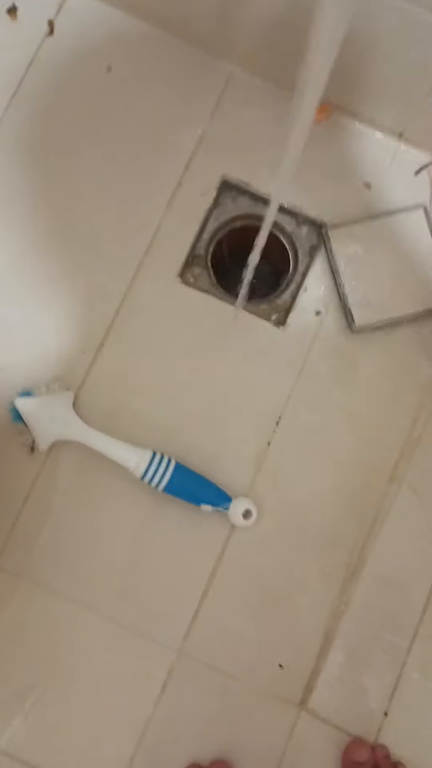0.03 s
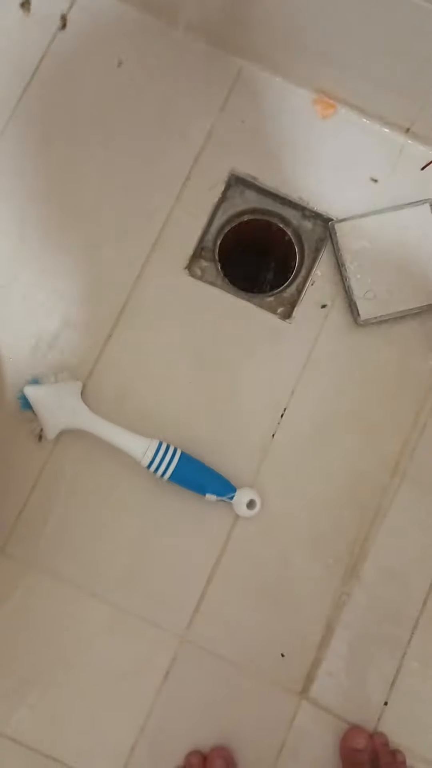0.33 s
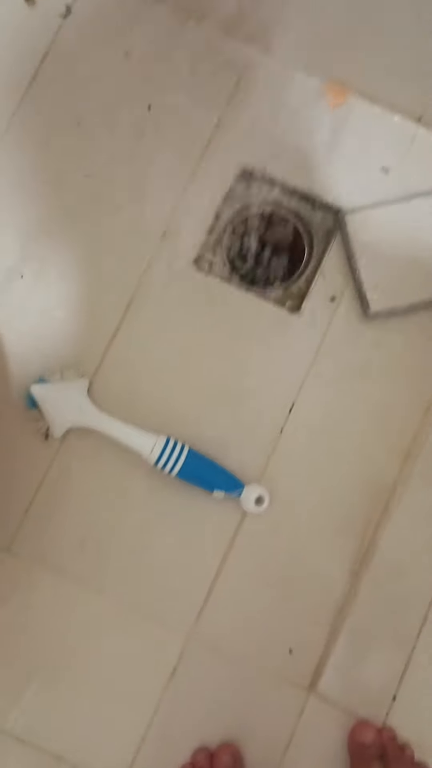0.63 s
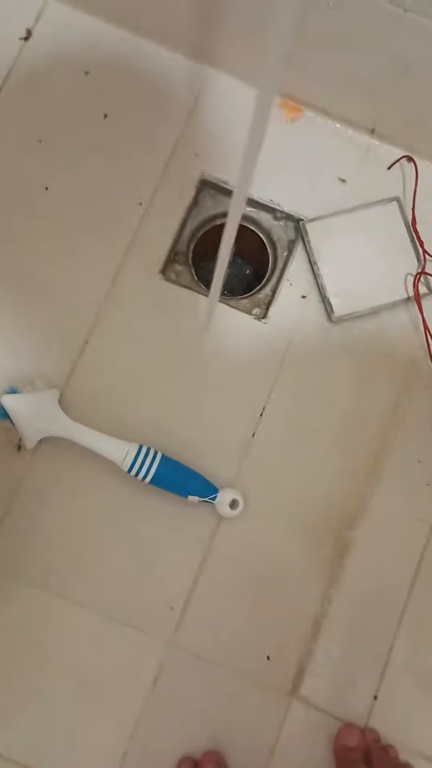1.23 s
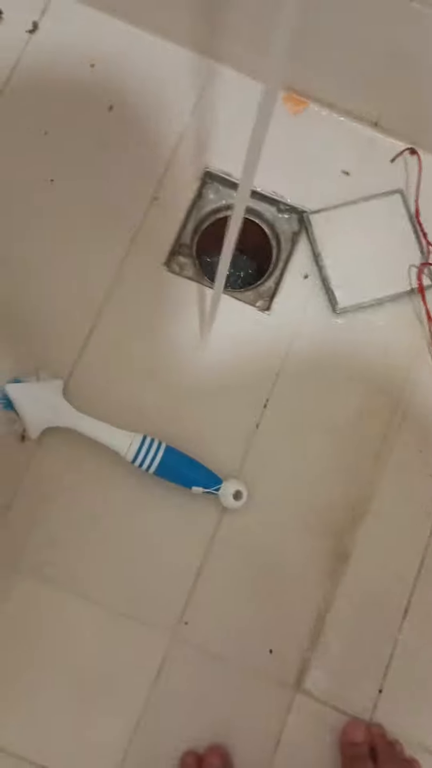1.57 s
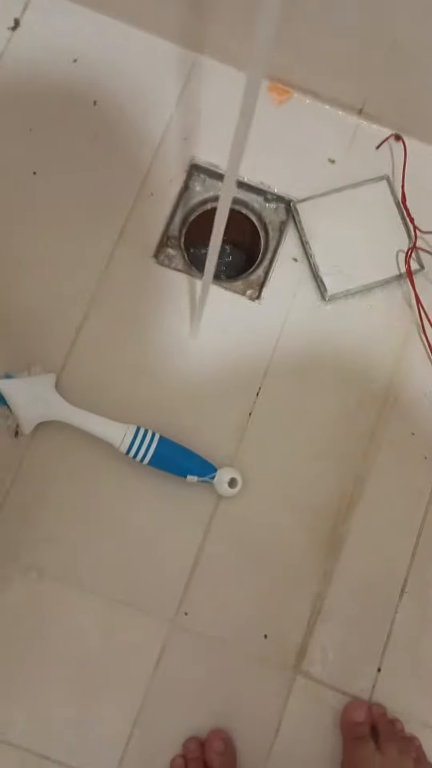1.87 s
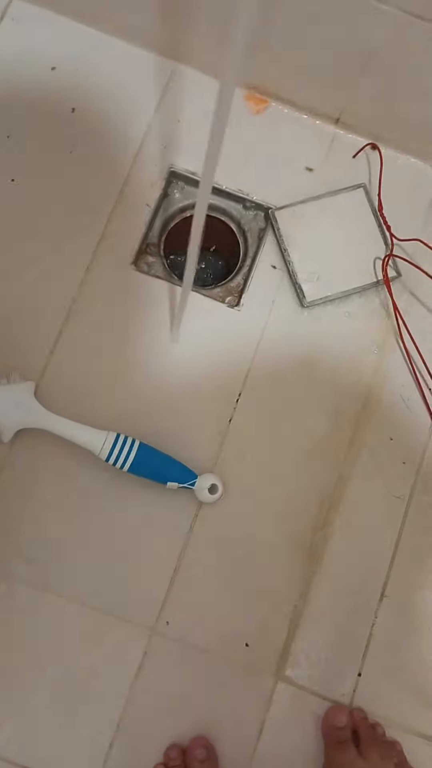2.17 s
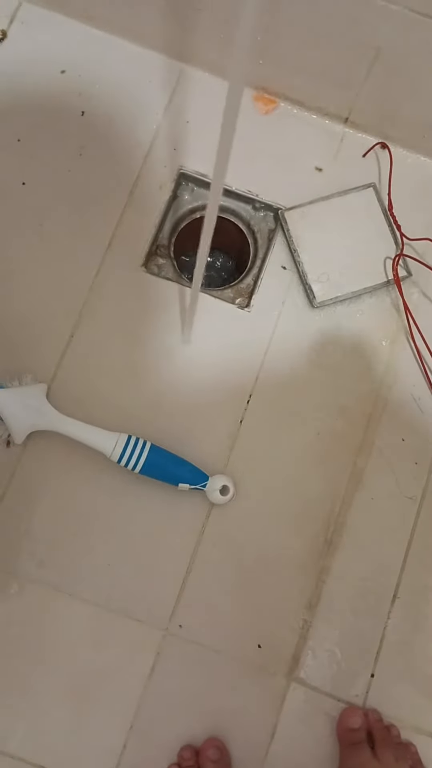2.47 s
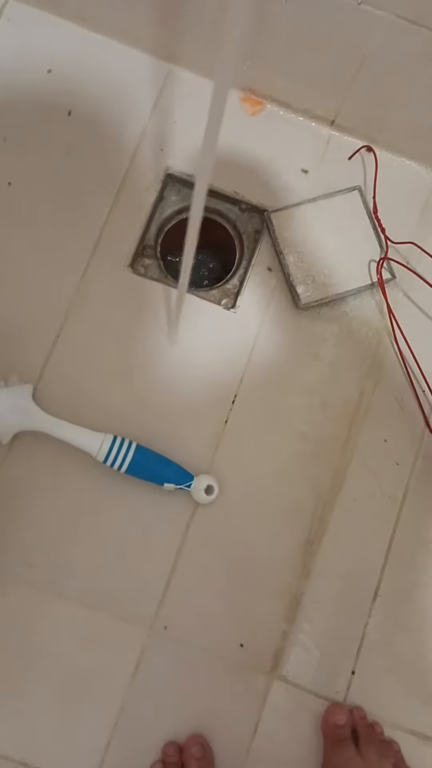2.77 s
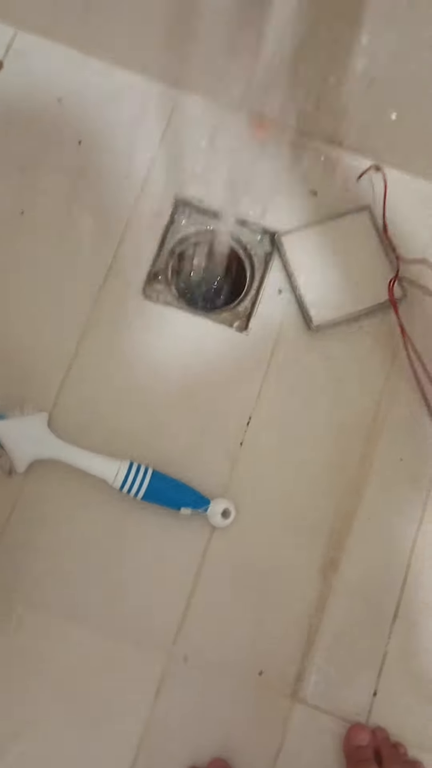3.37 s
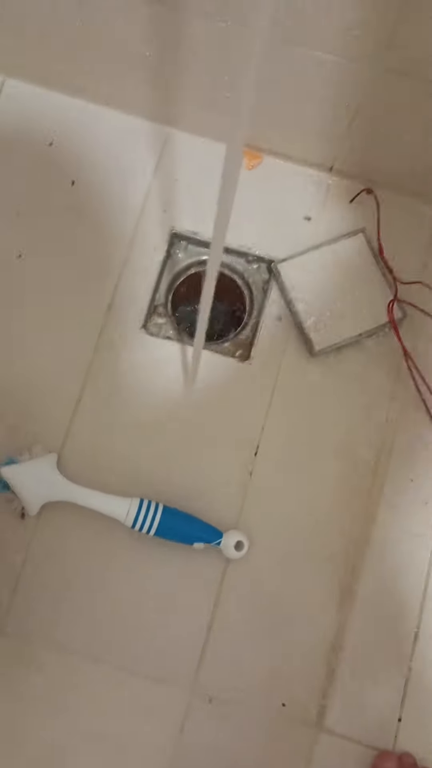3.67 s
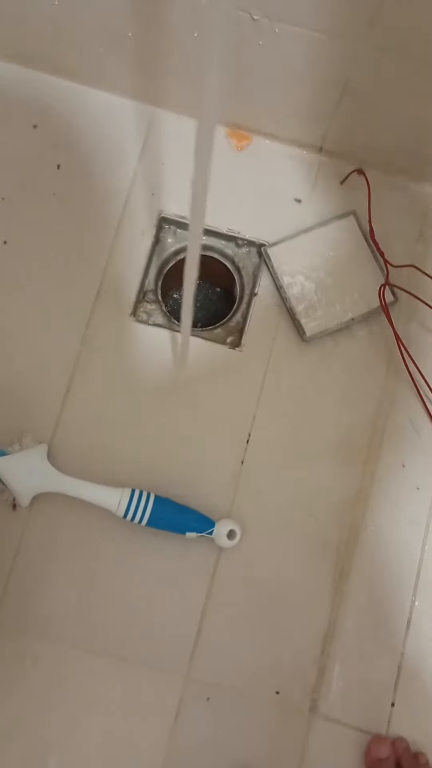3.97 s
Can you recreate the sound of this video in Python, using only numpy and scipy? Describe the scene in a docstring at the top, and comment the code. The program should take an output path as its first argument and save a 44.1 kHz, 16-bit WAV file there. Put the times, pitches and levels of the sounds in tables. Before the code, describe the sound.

A stream of water pours into a bathroom floor drain, splashing and briefly thinning twice.

```python
"""Small tiled bathroom, one microphone, close enough that the water is a little louder than its echoes.
From the start a jet falls into an open floor drain: clumps of drops patter on the water and the rim,
spray ticks on the tiles, bubbles ring and the drain pipe resonates. After 0.4 s the jet thins out, and
at 0.8 s it lands again with a slap. It runs on, thins once more near 3.4 s and slaps back at 3.6 s.
All the way through, the hard walls smear the sound over a low hum and rumble."""
import sys
import numpy as np
from scipy import signal
from scipy.fft import rfft, irfft
from scipy.io import wavfile
from scipy.ndimage import uniform_filter1d, map_coordinates

SR = 44100
rng = np.random.default_rng(int(sys.argv[2]) if len(sys.argv) > 2 else 0)


def wrap_up_sound(samples):
    """Save the sound to the file named by the first command line argument, as 16-bit audio."""
    columns = np.atleast_2d(samples).T
    # keep every value between -1 and 1, then stretch to whole-number steps
    tamed = np.clip(columns, -1, 1)
    steps = np.round(tamed * 32767).astype(np.int16)
    wavfile.write(sys.argv[1], SR, steps)


N = 176400

# Strength of the jet at the drain, relative levels (time [s], churn [dB], patter [dB], spray [dB])
JET_FLOW = [(0, -34.5, -25, -24), (.1, -40, -29, -30.5), (.21, -41.5, -28.5, -27.5),
            (.245, -32, -20.5, -23.5), (.35, -37.5, -27, -24), (.43, -42, -36, -34.5),
            (.55, -40.5, -37, -39), (.63, -44.5, -28.5, -28), (.71, -48, -45, -39.5), (.8, -52, -44, -35.5),
            (.85, -34, -27, -28.5), (.94, -36, -27, -29), (1.1, -41.5, -26.5, -29.5),
            (1.42, -40.5, -29, -29.5), (1.61, -45, -33.5, -30.5), (1.77, -41, -27.5, -29),
            (2.0, -44.5, -31.5, -29), (2.08, -40, -29.5, -32.5), (2.18, -40.5, -29.5, -30.5),
            (2.72, -44.5, -30, -30), (2.84, -40, -29.5, -31.5), (3.24, -43, -32, -27.5),
            (3.37, -45.5, -40.5, -46), (3.55, -58, -47.5, -39), (3.64, -35.5, -29, -28),
            (3.76, -39, -30, -30.5), (3.84, -40, -28, -27.5), (4.0, -44.5, -28, -29)]
def jet():
    """The falling water: churn, patter and spray follow the flow; pipe and bubbles follow the patter."""
    churn_level, patter_level, spray_level = (undb(along(JET_FLOW, column)) for column in (1, 2, 3))
    lumps = clumps()
    landing = churn(churn_level, lumps) + patter(patter_level, lumps) + spray(spray_level, lumps)
    landing += mist(spray_level)
    ringing = drain_pipe(patter_level * steady(drops() * lumps)) + bubbles(patter_level)
    return landing + ringing + slaps() + gulps()


# Spectrum of the water churning in the drain (frequency [Hz], relative level [dB])
CHURN_SPECTRUM = [(40, -63), (250, -20), (650, -21), (950, -6), (1300, -6), (1700, 0.5), (2200, 0.5),
                  (2800, -0.5), (4000, -8), (8000, -53)]
def churn(level, lumps, gain_db=2):
    """The jet stirs the standing water: the lowest band of its impacts."""
    return colour(undb(gain_db) * level * impacts(lumps, edges_hz=[1500]), CHURN_SPECTRUM)


# Spectrum of drops on the water and the rim (frequency [Hz], relative level [dB])
PATTER_SPECTRUM = [(40, -75), (900, -31), (2200, -16.5), (2550, -11), (3000, 1), (3600, -0.5), (4500, 2.5),
                   (5350, 2), (5900, 6), (6700, -5), (7800, -12), (10000, -27.5), (16000, -20)]
def patter(level, lumps, gain_db=-2.5):
    """Clumps of drops strike water and rim; each landing lump adds a smack."""
    hits = undb(gain_db) * level * impacts(lumps, edges_hz=[3300, 4300, 5400])
    return colour(hits + splashes(column=2), PATTER_SPECTRUM)


# Spectrum of spray on the tiles around the drain (frequency [Hz], relative level [dB])
SPRAY_SPECTRUM = [(40, -75), (3000, -58), (6500, -9), (8000, -11), (9000, -6), (9700, -3), (10350, -1.5),
                  (11000, -7), (12000, -12.5), (13500, -18), (15700, -28)]
def spray(level, lumps, gain_db=0.7):
    """Small drops tick on the tiles, with a burst from each landing lump."""
    ticks = undb(gain_db) * level * impacts(lumps, edges_hz=[9700, 11840])
    return colour(ticks + splashes(column=3), SPRAY_SPECTRUM)


# Spectrum of the finest droplets (frequency [Hz], relative level [dB])
MIST_SPECTRUM = [(40, -75), (6000, -24), (10000, -7), (12000, -9), (13500, 5), (15700, 5)]
def mist(level, gain_db=-15):
    """The finest droplets merge into a high hiss."""
    hiss = steady(drops() + rng.standard_normal(N))
    return colour(undb(gain_db) * level * hiss, MIST_SPECTRUM)


def impacts(lumps, edges_hz):
    """Drops arrive in clumps: each band flutters on its own, over a weaker flutter shared by all."""
    hz, spectrum = np.arange(N // 2 + 1) * SR / N, rfft(drops())
    edges, out = [0] + edges_hz + [SR], np.zeros(N)
    for low, high in zip(edges, edges[1:]):
        band = irfft(spectrum * (hz >= low) * (hz < high), N)
        out += band * np.hypot(clumps(), lumps * .5)
    return steady(out, size=4000)


def clumps(per_s=55, decay_s=0.0069, strength_db=4.5):
    """The jet breaks into lumps: each raises the level at once and fades."""
    hits = (rng.random(N) < per_s / SR) * 3 * rng.random(N) ** 2
    power = signal.lfilter([1], [1, -np.exp(-1 / (SR * decay_s))], hits)
    return np.sqrt(1 + undb(strength_db) ** 2 * power)


def drops(per_s=5000, spread_db=3.2):
    """Dense impacts, mostly small, a few large."""
    out, hit = np.zeros(N), rng.random(N) < per_s / SR
    draw = rng.uniform(-1, 1, N)[hit]
    size = np.minimum(-np.log(np.abs(draw)), np.pi)
    out[hit] = np.sign(draw) * undb(spread_db * size)
    return unit(out)


# Lumps of water landing, relative levels (time [s], slap [dB], smack [dB], spray [dB])
LANDINGS = [(.157, -40, -23.5, -20.5), (0.33, -34, -17.5, -28), (0.338, -20.5, -18, -24),
            (0.349, -28, -23, -24), (0.5904, -33, -28.5, -23.5), (0.6778, -35, -21, -38),
            (.7926, -46, -33.5, -30), (0.81, -25, -33, -25), (0.8165, -21, -36, -33), (0.88, -32, -27, -36),
            (0.914, -37, -24, -23.5), (0.957, -28, -20, -21), (1.032, -30, -25, -28),
            (1.512, -42, -23, -29), (1.681, -30, -42, -33), (1.791, -42, -23, -29), (2.047, -33, -22, -35),
            (2.099, -27, -33, -22), (2.165, -44, -26, -39), (2.448, -45, -47, -24),
            (2.473, -30, -24.5, -22.5), (2.6704, -43, -22.5, -19.5), (2.804, -40, -32, -19),
            (3.016, -34, -23, -31), (3.128, -42, -23, -21), (3.4175, -55, -51, -27.5),
            (3.467, -53, -38, -28), (3.5134, -42, -34, -30), (3.547, -38, -36, -30),
            (3.561, -42, -27.5, -41), (3.5864, -32, -20.5, -36), (3.613, -20.5, -25, -28),
            (3.6208, -14.5, -20, -31), (3.653, -32, -18, -31), (3.666, -19, -22, -34)]
def splashes(column, crack_s=0.0047, spatter_s=0.066, spatter_db=-10.5, gain_db=1):
    """Each landing lump cracks, then spatters."""
    age, power = np.arange(SR // 4) / SR, np.zeros(N + SR)
    envelope = np.exp(-age / crack_s) + undb(spatter_db) * np.exp(-age / spatter_s)
    for row in LANDINGS:
        i = int(row[0] * SR)
        power[i:i + len(age)] += (undb(row[column]) * envelope) ** 2
    return undb(gain_db) * np.sqrt(power[:N]) * steady(rng.standard_normal(N), size=100)


# Spectrum of a lump hitting the water (frequency [Hz], relative level [dB])
SLAP_SPECTRUM = [(40, -77), (350, -42), (700, -24.5), (1000, -14), (1400, -7), (1900, -0.5), (2500, 0.5),
                 (3300, -0.5), (4200, -4), (6000, -28), (9000, -65)]
def slaps():
    """Lumps slap into the water: the body of each splash."""
    return colour(splashes(column=1), SLAP_SPECTRUM)


# Hollows the jet opens in the water (time [s], decay [s], pitch [Hz], glide [octaves/s], level [dB])
HOLLOWS = [(0.526, 0.023, 2414, -2.5, -31.5), (.814, .035, 2088, 0, -26), (2.051, 0.022, 1210, -0.5, -35.5),
           (2.24, 0.071, 2650, -0.5, -30), (2.551, 0.012, 2890, -18, -23.5),
           (2.57, 0.051, 2068, 3.5, -33.5), (2.649, .09, 2975, 3.5, -30.5), (2.9, 0.029, 2600, -1, -39),
           (3.28, 0.082, 3230, 2, -37.5), (3.62, 0.012, 2895, 1, -16), (3.7, 0.029, 2610, -0.5, -26)]
def gulps(width_hz=380, attack_s=0.0016):
    """Splashing rings each hollow, whose pitch glides as it opens or closes."""
    out, age = np.zeros(N + SR), np.arange(SR // 2) / SR
    for start, decay, hz, glide, db in HOLLOWS:
        octaves = np.clip(glide * age, -.5, .5)
        phase = 2 * np.pi * np.cumsum(hz * 2 ** octaves) / SR
        narrow_noise = sum(walk(width_hz, len(age)) * wave(phase) for wave in (np.cos, np.sin))
        envelope = np.exp(-age / decay) * (1 - np.exp(-age / attack_s))
        i = int(start * SR)
        out[i:i + len(age)] += undb(db) * steady(narrow_noise, size=800) * envelope
    return out[:N]


def bubbles(level, per_s=400, low_hz=2350, high_hz=7000, decay_cycles=18, rise=.025, gain_db=-5.5):
    """Trapped air rings briefly and rises in pitch."""
    out, candidates = np.zeros(2 * N), 2500
    for when, pitch, size, life, chance in rng.random((candidates, 5)):
        if chance * candidates < per_s * N / SR:
            hz = low_hz * (high_hz / low_hz) ** pitch
            decay_s = decay_cycles * (.5 + life) / hz
            age = np.arange(int(np.log(200) * decay_s * SR)) / SR
            phase = 2 * np.pi * hz * age * (1 + rise * age / decay_s / 2)
            i = int(when * N)
            out[i:i + len(age)] += (size + 0.22) ** -.5 * np.exp(-age / decay_s) * np.sin(phase)
    return undb(gain_db) * level * steady(unit(out[:N]), size=8000)


# Resonances of the drain's mouth (frequency [Hz], relative level [dB])
PIPE_MODES = [(1657, 0), (2455, 2.5), (2648, -26), (2835, 12), (2991, 6.5), (3205, -28), (3709, -23),
              (4010, -29), (4383, 13), (5005, 15), (5690, 14), (5928, 18), (7100, 8.5)]
def drain_pipe(hits, t60_s=0.24, gain_db=-11.5):
    """The drain's mouth rings with the drops that land in it."""
    t = np.arange(SR // 2) / SR
    modes = sum(undb(db) * np.sin(2 * np.pi * hz * t) for hz, db in PIPE_MODES)
    response = modes * undb(-60 * t / t60_s)
    return undb(gain_db) * ring(hits, response / np.linalg.norm(response))


def bathroom(direct, paths=4, drift_hz=5.4, echo_db=-3):
    """The point of impact wanders, so the paths by the walls to the microphone keep changing."""
    shares = np.array([walk(drift_hz) for _ in range(paths)])
    shares /= np.linalg.norm(shares, axis=0)
    echoes = sum(ring(direct * share, tiles()) for share in shares)
    return (direct + undb(echo_db) * echoes) / np.hypot(1, undb(echo_db))


# Reverberation of the tiled room (frequency [Hz], time to fall by 60 dB [s])
ROOM_DECAY = [(500, 0.25), (2000, 0.46), (5000, 0.41), (10000, 0.54), (16000, 0.62)]
def tiles(first_echo_s=.003):
    """Echoes off the nearby tiles thicken quickly into a bright tail whose lows die first."""
    t = np.arange(SR) / SR
    echoes = rng.standard_normal(SR) * (rng.random(SR) < .06 + (t / .04) ** 2)
    echoes = steady(echoes, size=400) * (t > first_echo_s)
    hz, times, spectra = signal.stft(echoes, SR, nperseg=256)
    fade = np.exp(-np.log(1000) * times / by_pitch(ROOM_DECAY, hz)[:, None])
    tail = signal.istft(spectra * fade, SR)[1]
    return tail / np.linalg.norm(tail)


# Spectrum of the rumble at the microphone (frequency [Hz], relative level [dB])
RUMBLE_SPECTRUM = [(25, -64), (48, -41), (62, -37), (72, -4), (85, -6), (100, -1.5), (118, 1), (135, -12.5),
                   (170, -10.5), (200, 0), (260, -0.5), (340, 2.5), (410, -2), (480, -9.5), (680, -10),
                   (1200, -5), (4000, -59)]
def room_tone(hum_hz=99, hum_db=-60, rumble_db=-50):
    """Behind the water, a low rumble and a hum that wavers in pitch and level."""
    phase = 2 * np.pi * np.cumsum(hum_hz + 2.0 * walk(16.4)) / SR
    hum = unit(np.sin(phase) * (1 + 0.89 * walk(7)))
    rumble = colour(rng.standard_normal(N), RUMBLE_SPECTRUM, size=16384)
    return undb(rumble_db) * rumble + undb(hum_db) * hum


def undb(db):
    return 10 ** (np.asarray(db) / 20)


def unit(x):
    return x / np.sqrt(np.mean(x ** 2) + 1e-18)


def along(rows, column):
    """One column of a timed table, for every sample."""
    rows = np.array(rows, float)
    return np.interp(np.arange(N) / SR, rows[:, 0], rows[:, column])


def by_pitch(points, hz):
    """Reads (frequency [Hz], value) points on a log axis."""
    points = np.array(points, float)
    return np.interp(np.log(hz + 1e-9), np.log(points[:, 0]), points[:, 1])


def ring(x, response):
    return signal.fftconvolve(x, response)[:N]


def colour(x, points, size=1024):
    """Causal filter with the given spectrum; keeps the power of white input."""
    hz = np.arange(size // 2 + 1) * SR / size
    cepstrum = irfft(np.log(undb(by_pitch(points, hz))))
    cepstrum[1:size // 2] *= 2  # fold to minimum phase
    cepstrum[size // 2 + 1:] = 0
    response = irfft(np.exp(rfft(cepstrum)))
    return ring(x, response / np.linalg.norm(response))


def walk(rate_hz, count=N):
    """Smooth random curve with spread 1 that changes at about the given rate."""
    knots = rng.standard_normal(8192)
    return 1.07 * map_coordinates(knots, [np.arange(count) * 1.5 * rate_hz / SR], order=3, mode="mirror")


def steady(x, size=5000):
    """Holds the level of a texture at 1, averaged over size samples."""
    return x / np.sqrt(np.abs(uniform_filter1d(x ** 2, size)) + 1e-12)


def scene():
    """At the microphone, in mono: the jet, its echoes and the room tone."""
    return (bathroom(jet()) + room_tone())[None]


def record(dry, top_hz=15800):
    """The recorder cuts the top steeply."""
    return signal.sosfilt(signal.ellip(12, .1, 80, top_hz, fs=SR, output="sos"), dry)


dry = scene()
out = record(dry)
wrap_up_sound(out)
```